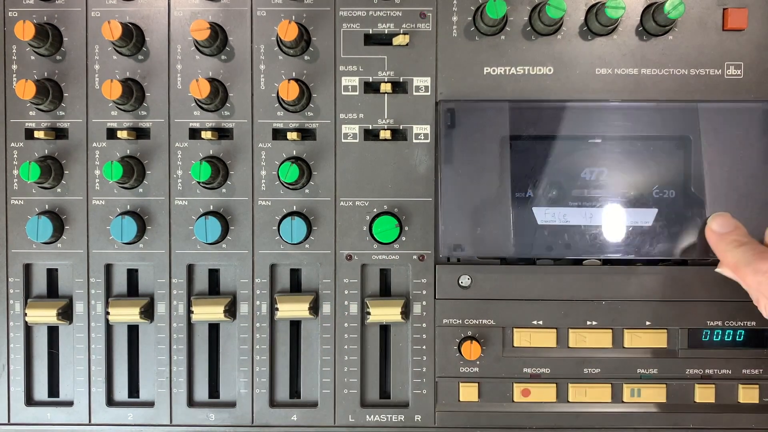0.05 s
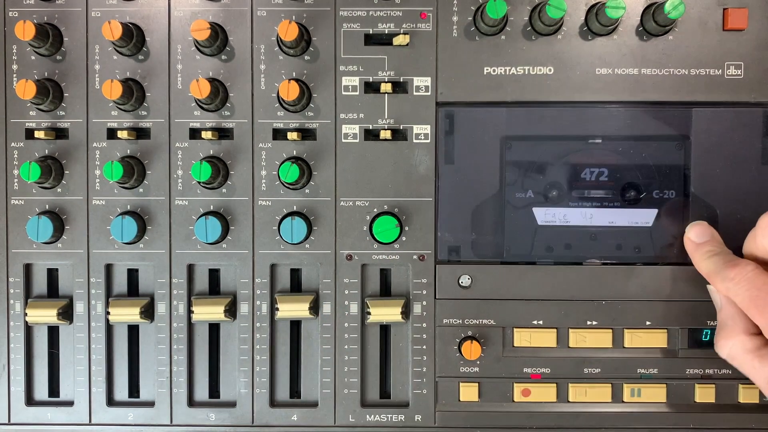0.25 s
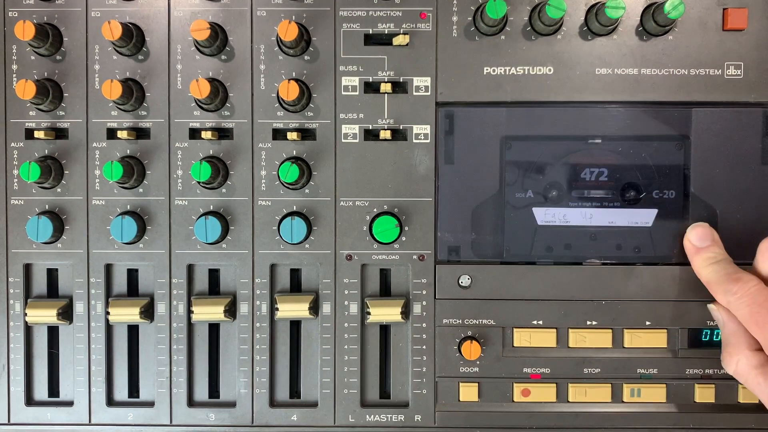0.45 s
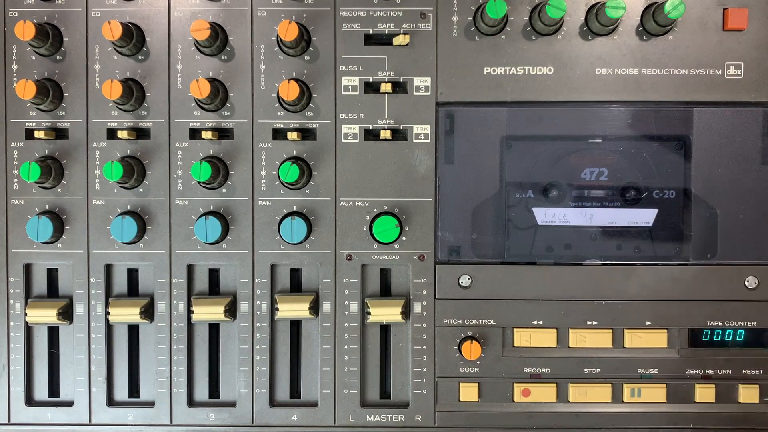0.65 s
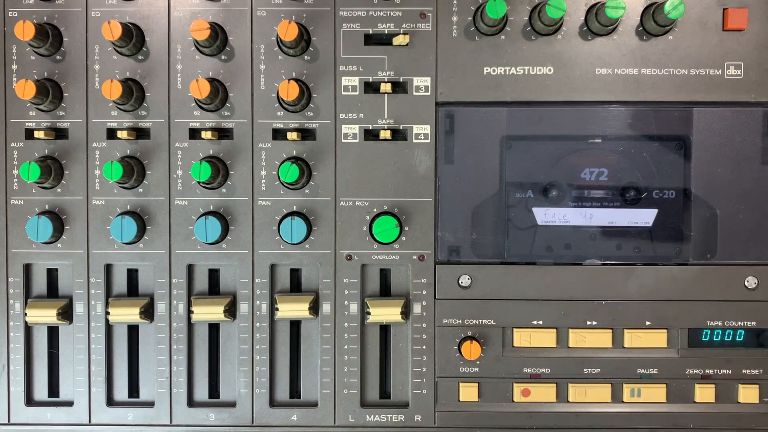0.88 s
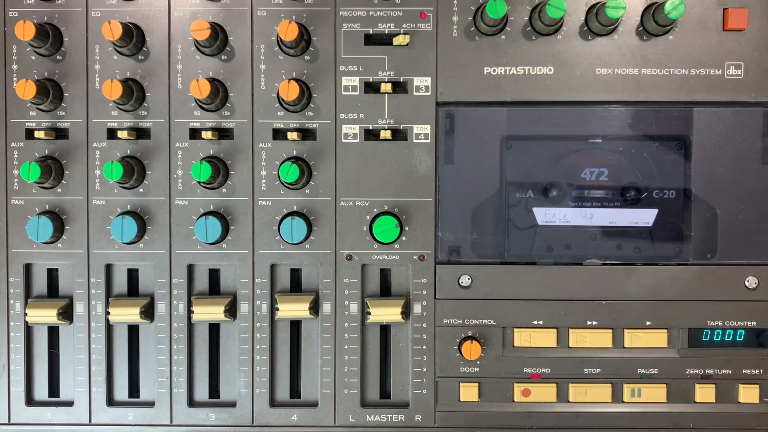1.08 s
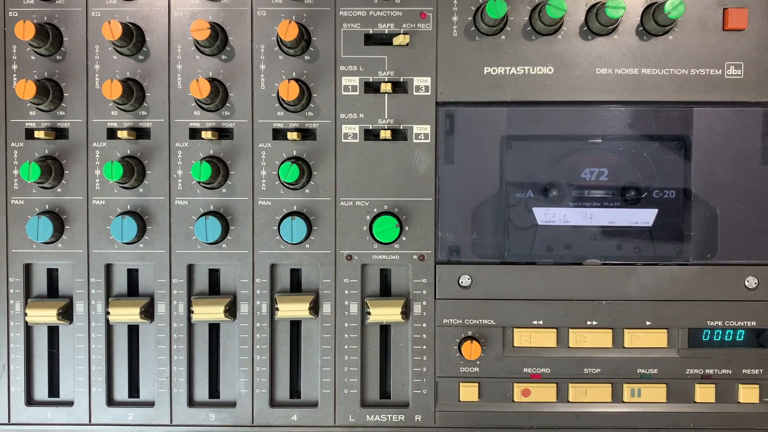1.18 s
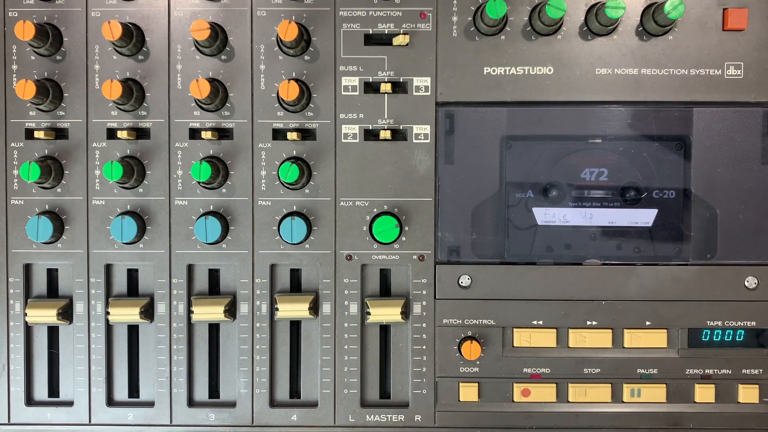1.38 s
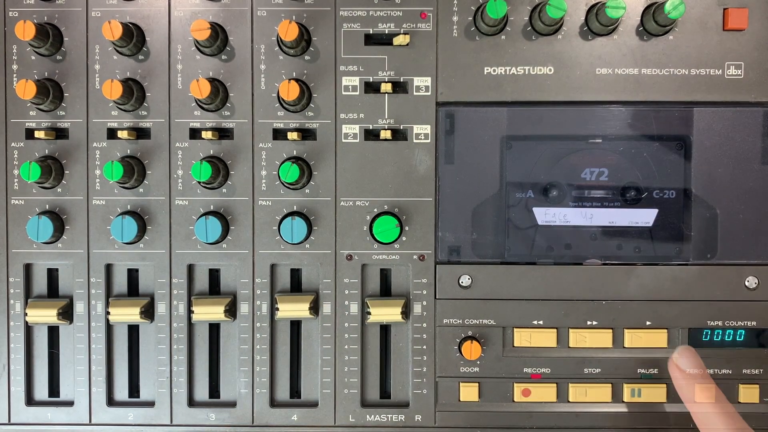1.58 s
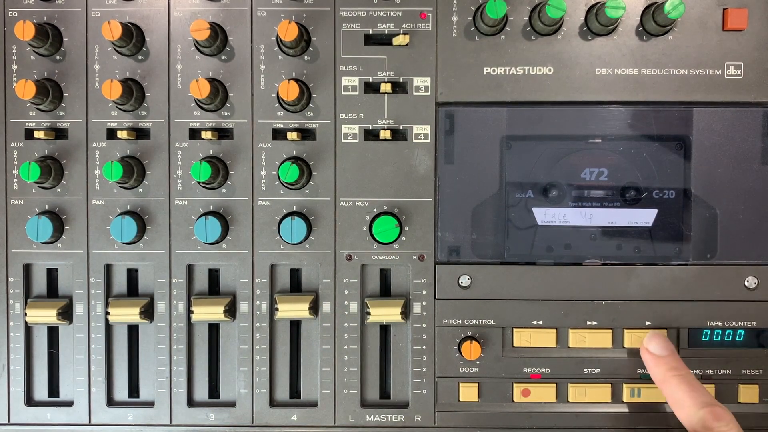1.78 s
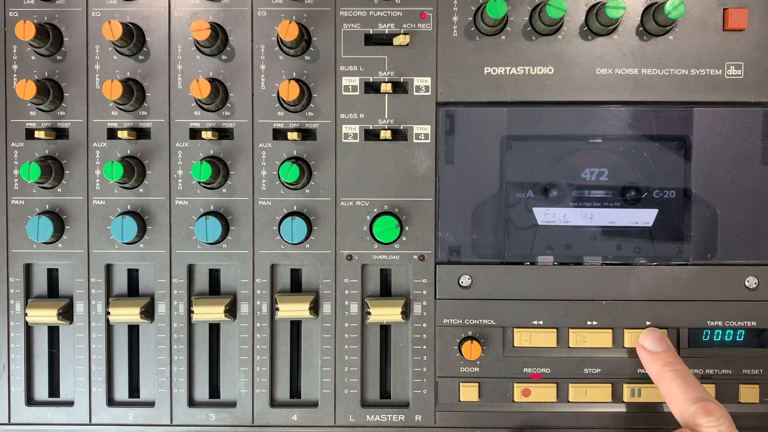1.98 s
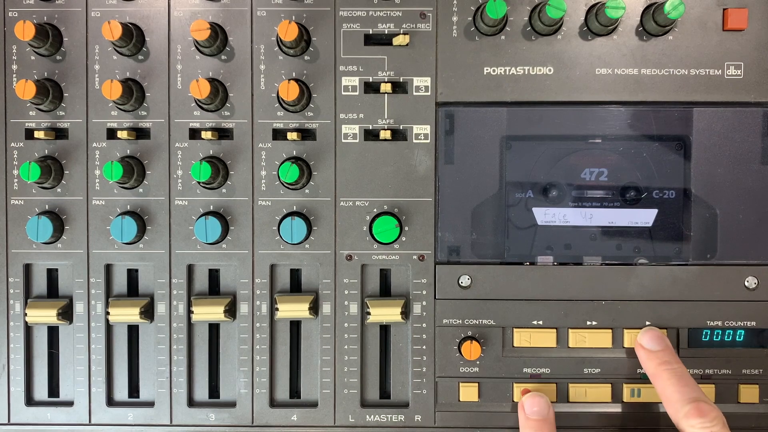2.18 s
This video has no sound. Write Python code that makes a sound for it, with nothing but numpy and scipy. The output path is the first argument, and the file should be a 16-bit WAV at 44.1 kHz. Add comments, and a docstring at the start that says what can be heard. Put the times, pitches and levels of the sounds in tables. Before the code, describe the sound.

A cassette recorder lid closes: a finger faintly rubs plastic from 0.07 seconds, a tick at 0.19, then a very loud, bright snap at 0.22 with a low desk thump. Softer latch clicks come at 0.58 and 0.62. Quiet room air and low hum remain until a key clunks sharply at 1.91, with smaller clicks to 2.24 over faint mechanism hiss and clatter. Small room, close phone microphone.

```python
"""Quiet air, faint narrow bands and a low hum lie under everything, in a small room heard by a phone close above.
A finger rubs the plastic lid of a desk cassette recorder (shaped noise) and pushes it shut: a tick, a loud snap,
then the latch clicks twice as the finger lets go. Each blow is a noise crack plus a push that rings tuned modes.
The snap comes with the desk ringing in low sines. Later a key is pressed and the mechanism clunks in with more
blows, then runs with a noise hiss and a clatter of random ticks through its own modes."""
import sys
import numpy as np
from scipy import signal
from scipy.fft import rfft, irfft
from scipy.io import wavfile
from scipy.ndimage import uniform_filter1d

SR = 44100
rng = np.random.default_rng(int(sys.argv[2]) if len(sys.argv) > 2 else 0)


def persist_wave(psi):
    """Save psi, clipped to +-1, as 16-bit WAV."""
    counts = np.round(np.clip(psi, -1, 1) * 32767).astype(np.int16)
    wavfile.write(sys.argv[1], SR, np.atleast_2d(counts).T)


N = 99225  # length in samples, 2.25 s

# quiet air, relative spectrum: pitch_hz, density_db (per Hz)
AIR_SPECTRUM = [(20, -23), (40, -8.5), (70, 4.5), (120, -12), (180, -25.5), (460, -31.5), (1000, -36.5),
                (2000, -39), (4000, -43), (9000, -43), (11000, -44.5), (16000, -59.5)]
# faint narrow bands in the air: pitch_hz, level_db (before the air's sag), loudest_s, fall_db_per_s away from it
FAINT_BANDS = [(231, -86, 0.77, 3), (444, -96, .6, 1.5), (2045, -87.5, 1.1, 9), (3860, -92.5, 1.4, 19.5),
               (890, -98, 1.6, 14.5)]
AIR_DB, AIR_SAG_DB_PER_S, AIR_LEVEL_AT_S = -67, -6, 1.77  # the sag passes 0 dB at the last of these
BAND_WAVER_PER_S = 25

# low hum: time_s, level_db, pitch_hz
HUM_CURVE = [(0.0, -58, 90.4), (0.14, -55.5, 91.87), (0.27, -49.5, 89.36), (0.62, -56, 89.5),
             (1.03, -61.5, 90.17), (1.22, -63.5, 90.44), (1.4, -67, 90.27), (1.92, -57.5, 90.8),
             (2.25, -57, 92.4)]
# ringing of the desk: time_s, level_db, pitch_hz
DESK_CURVE = [(0.2, -23, 56.4), (0.23, -23.5, 64.3), (0.26, -27, 60.6), (0.32, -48, 57.8),
              (0.36, -40.5, 60.5), (0.41, -53, 61.3), (0.49, -53.5, 57), (0.53, -50, 63.5),
              (0.64, -42, 64.72), (0.74, -54.5, 64), (0.8, -70, 66.4), (0.84, -56, 64.2),
              (0.92, -60.5, 65.7), (0.98, -49, 63.45), (1.05, -57.5, 62.3), (1.14, -45.5, 61.1),
              (1.23, -46.5, 62.02), (1.4, -56, 61.8), (1.62, -62.5, 60.45), (1.78, -79, 60.47),
              (2.11, -57.5, 61.6), (2.25, -67, 66)]
# low thuds through the desk: start_s, pitch_hz, level_db (before swell and decay), rise_s, t60_s
DESK_THUDS = [(0.22, 32.3, -44, 0.0038, 0.16), (0.219, 93, -42, 0.026, 0.083),
              (0.242, 115, -20, 0.005, 0.11), (0.587, 95.6, -35, 0.0069, 0.35),
              (0.64, 117, -16.5, 0.084, 0.18), (0.601, 45, -33.5, 0.044, 0.39),
              (2.076, 103.9, -46, 0.015, 0.13)]

# decay time of the room: pitch_hz, t60_s
ROOM_DECAY = [(100, 0.31), (500, 0.36), (2000, 0.3), (6000, 0.25), (14000, 0.12)]
ROOM_DB, ROOM_RISE_S, ROOM_ALIKE = -7, 0.0013, 0.26
LINGER_DB, LINGER_T60_S, LINGER_HZ = -32.5, 2.2, 296  # quiet, slow low end of the tail
BODY_IN_ROOM_DB = -3

# hiss of the running mechanism, relative spectrum: pitch_hz, density_db (per Hz)
HISS_SPECTRUM = [(100, -8), (200, 0.5), (560, 4.5), (1100, -19.5), (1700, -6.5), (3000, -14.5), (5000, -16),
                 (7000, -10.5), (11000, -12), (14500, -5), (16000, -19.5)]
HISS_START_S, HISS_DB, HISS_SAG_DB_PER_S, HISS_FLICKER_DB = 1.915, -53, -12, 2
CLATTER_PER_S, CLATTER_DB, CLATTER_SCATTER_DB = 450, -59, 6
CLATTER_SAG_DB_PER_S, CLATTER_TILT_DB_PER_OCTAVE = -23, 4

# finger rubbing the lid, relative spectrum: pitch_hz, density_db (per Hz)
RUB_SPECTRUM = [(150, -14.5), (350, -4), (850, -21), (1130, -15.5), (1450, -24), (2080, -20.5),
                (4500, -27.5), (6000, -22), (8000, -24), (11000, -36.5), (16000, -40)]
RUB_START_S, RUB_SWELL_S, RUB_END_S, RUB_DB = .07, 0.09, 0.29, -50

# blows of key and mechanism: start_s, crack_level_db (before halving and shape), body_level_db (drive into
# the modes), crack_colour_hz, rise_ms, fall_ms, body_tilt_db_per_octave
KEY_BLOWS = [(1.829, -60, -63, 600, 6, 13.8, -5.5), (1.888, -52.5, -68, 2500, 21, 44, 0),
             (1.9125, -26, -49.5, 3490, 0.7, 1.95, 16), (1.9155, -22.5, -54, 2980, 0.87, 5.7, 11),
             (1.942, -38, -59.5, 1920, 4.6, 6.5, 13), (1.967, -36.5, -55, 8000, 2.1, 5, -4),
             (1.988, -36.5, -40, 1798, 4.6, 7.8, -0.8), (2.015, -45, -62, 800, 1.4, 4, -6.5),
             (2.034, -57.5, -51.5, 1197, 7, 5.6, -5.5), (2.066, -69, -45.5, 1620, 15, 8.5, 1.2),
             (2.093, -41, -64, 606, 2.1, 3.8, -9), (2.226, -44, -63, 2080, 7.7, 7.7, 12),
             (2.236, -37, -55, 1850, 1.5, 6.6, 6)]
# modes of the mechanism: pitch_hz, level_db (before tilt and scatter), t60_s
KEY_MODES = [(153, -12, 0.0663), (262, -26.5, 0.052), (338.7, -12.5, 0.275), (473.6, -4.5, 0.0992),
             (553, -12.5, 0.173), (680, -1, 0.047), (944, -5, 0.029), (1230, -2.5, 0.031),
             (1603, -5, 0.046), (1787, -5.5, 0.063), (2047, -11.5, 0.049), (2286, -16, 0.105),
             (3403, -18, 0.016), (4420, -17, 0.018)]
# blows on the lid: start_s, crack_level_db (before halving and shape), body_level_db (drive into the modes),
# crack_colour_hz, rise_ms, fall_ms, body_tilt_db_per_octave
LID_BLOWS = [(0.1866, -22.5, -33, 6940, 0.39, 12.4, 1.4), (0.2172, -6.5, -20, 2315, 1.8, 7.2, 0.5),
             (0.2226, 0.5, -26.5, 8130, 2.2, 5.1, 1.4), (0.2262, -6.5, -17, 7500, 0.6, 4.5, -0.6),
             (0.2305, -22.5, -27.5, 2910, 1.1, 13, -0.1), (0.2385, -30.5, -31.5, 8130, 2.35, 4.9, -0.5),
             (0.2605, -21.5, -34.5, 2960, 1.9, 1.8, -3), (0.279, -20.5, -38.5, 1930, 1.5, 3, -2),
             (0.5495, -56, -52.5, 6170, 2.3, 45, -1.5), (0.5826, -19.5, -53, 7330, 0.17, 3.9, -12),
             (0.583, -21.5, -33, 1700, 0.71, 9.2, -0.5), (0.604, -29, -39, 1300, 2.76, 8, 2),
             (0.6225, -20, -33, 7190, 0.33, 3.17, 1.2), (0.6255, -22, -40, 1570, 0.95, 4.6, -4.2),
             (0.645, -32, -42.5, 1500, 2.5, 7.1, -1.5), (0.652, -28, -54, 7000, 0.7, 2.2, -3.2),
             (0.655, -36, -44.5, 2018, 1.9, 2.8, -5), (0.806, -64, -80, 6010, 2.1, 4.46, 2),
             (0.984, -51.5, -71, 3540, 6.9, 12.95, 7.5)]
# modes of lid and case: pitch_hz, level_db (before tilt and scatter), t60_s
LID_MODES = [(191.3, -11, 0.2), (261.5, -8, 0.12), (325.2, 1, 0.091), (405, -0.5, 0.061), (468, -8, 0.081),
             (579, -8.5, 0.036), (655, -8, 0.064), (741.5, -8, 0.065), (965, -11, 0.035),
             (1090, -14, 0.034), (1300, -15, .04), (1600, -9, 0.04), (1712.6, -34.5, 0.7),
             (1861, -7, 0.032), (2155, -10, 0.045), (2380, -17.5, .04), (2700, -17, .03),
             (3250, -19.5, .04)]

CRACK_WIDTH_OCTAVES, CRACK_TOP_HZ = 0.79, 12800
CRACK_BROAD_DB, BROAD_REACH = -20, 7  # the broad part rolls off this many times above the crack's colour
PUSH_MS, GRIT_HZ, GRIT_DB = 0.3, 483, 7.5
MODE_SCATTER_DB, MODE_SCATTER_SHARE = 1.5, 0.011  # every blow finds the modes a little different

# level of the left port: pitch_hz, level_db
LEFT_LEVEL = [(0, -1.3), (2500, -2.5), (4000, -.2), (16000, 0)]
# phase of the left port against the right: pitch_hz, lead_half_cycles (negative trails)
LEFT_LEAD = [(0, 0), (500, -.1), (2700, .42), (5300, 1), (8400, 2), (12500, 3), (16500, 4)]
ALIKE_BELOW_HZ, ALIKE_ABOVE_HZ = 84, 6500  # noises become the same in both ports beyond these
TOP_HZ = 16300


def amp(db):
    """Turn decibels into a gain."""
    return 10 ** (np.asarray(db) / 20)


def unit(x):
    """Scale to an rms of 1."""
    return x / np.sqrt(np.mean(x ** 2))


def decay(t, t60):
    """Exponential decay that falls 60 dB in t60 seconds."""
    return np.exp(-np.log(1000) * t / t60)


def shaped(x, gain):
    """Filter by a gain that is a function of frequency."""
    n = x.shape[-1]
    hz = np.arange(n // 2 + 1) * SR / n + 1  # the extra 1 Hz keeps logarithms finite
    return irfft(rfft(x) * gain(hz), n)


def pair(size, alike):
    """Two noises, the same in the bass and high treble, partly alike between."""
    a, b = rng.standard_normal((2, size))

    def separate(f):
        bass_cut = f ** 2 / (f ** 2 + ALIKE_BELOW_HZ ** 2)
        treble_cut = 1 / (1 + (f / ALIKE_ABOVE_HZ) ** 10)
        return np.sqrt(1 - min(alike, 1) ** 2) * bass_cut * treble_cut

    common = shaped(a, lambda f: np.sqrt(1 - separate(f) ** 2))
    return np.array([a, common + shaped(b, separate)])


def noise(spectrum, alike):
    """Two-channel noise of a given spectrum; rms 1."""
    hz, db = np.array(spectrum).T
    return unit(shaped(pair(N, alike), lambda f: amp(np.interp(np.log(f), np.log(hz), db))))


def walk(rate):
    """Smoothed random steps, rate per second, spread near 1."""
    k = int(SR / rate)
    steps = np.repeat(rng.standard_normal(N // k + 1), k)
    return 1.4 * uniform_filter1d(uniform_filter1d(steps, k), k)[:N]


def tone(curve, t):
    """A low sine on a level and pitch curve, silent before its first point."""
    s, db, hz = np.array(curve).T
    level = np.sqrt(2) * amp(np.interp(t, s, db, left=-120))
    phase = 2 * np.pi * np.cumsum(np.interp(t, s, hz)) / SR
    return level * np.sin(phase)


def faint_bands(t):
    """Narrow bands of noise, each wavering and loudest at its own moment."""
    bands = 0
    for hz, db, loudest, fall in FAINT_BANDS:
        level = amp(db - fall * np.abs(t - loudest) + 3.0 * walk(BAND_WAVER_PER_S))
        band = shaped(rng.standard_normal(N), lambda f: 1 / (1 + ((f - hz) / (0.034 * hz)) ** 2))
        bands = bands + level * unit(band)
    return bands


def room_air(t):
    """Quiet broadband air noise with the faint bands, steadily getting quieter."""
    bands = faint_bands(t)
    air = noise(AIR_SPECTRUM, 0.1) * amp(AIR_DB + 0.69 * walk(24))
    return (air + bands) * amp(AIR_SAG_DB_PER_S * (t - AIR_LEVEL_AT_S))


def hum(t):
    """A low sine near 90 Hz that drifts in level and pitch."""
    return tone(HUM_CURVE, t)


def thuds(t):
    """Low sine rings that swell and die away through the desk."""
    out = 0
    for s, hz, db, rise, t60 in DESK_THUDS:
        age = np.maximum(t - s, 0)
        out = out + amp(db) * np.sin(2 * np.pi * hz * age) * (1 - np.exp(-age / rise)) * decay(age, t60)
    return out


def desk(t):
    """The ringing desk: one drifting low sine, faded in over 80 ms, plus the thuds."""
    fade_in = np.clip((t - DESK_CURVE[0][0]) / 0.08, 0, 1)
    return tone(DESK_CURVE, t) * fade_in + thuds(t)


def room(x):
    """Reverb from a decaying noise tail, band by band, partly alike in both ports."""
    t, tail = np.arange(SR) / SR, 0
    hz, t60 = np.array(ROOM_DECAY).T
    for centre in 2 ** np.arange(7, 14.1, 1):  # octave bands from 128 Hz
        band = shaped(pair(len(t), ROOM_ALIKE),
                      lambda f: np.cos(np.pi / 2 * np.clip(np.log2(f / centre), -1, 1)))
        tail = tail + band * decay(t, np.interp(np.log(centre), np.log(hz), t60))
    low = shaped(pair(len(t), ROOM_ALIKE), lambda f: np.exp(-np.log2(f / LINGER_HZ) ** 2))
    tail = tail + amp(LINGER_DB) * low * decay(t, LINGER_T60_S)  # the lows linger
    tail = tail * (1 - np.exp(-t / ROOM_RISE_S))
    tail = tail / np.sqrt(np.sum(tail ** 2) / 2)  # unit energy per port on average
    return signal.fftconvolve(x[None], tail, axes=1)[:, :N] * amp(ROOM_DB)


def ring(modes, tilt_db):
    """Decaying sines answer one tap; neighbours start in opposite directions, short modes are scattered."""
    t = np.arange(SR // 2) / SR
    hz, db, t60 = np.array(modes).T[:, :, None]
    chance = rng.standard_normal((2, len(modes), 1)) * (t60 < .3)  # long modes stay in tune
    sign = (-1.) ** np.arange(len(modes))[:, None]
    gain = sign * amp(db + tilt_db * np.log2(hz / 1000) + MODE_SCATTER_DB * chance[0])
    detuned_hz = hz * (1 + MODE_SCATTER_SHARE * chance[1])
    return np.sum(gain * np.sin(2 * np.pi * detuned_hz * t) * decay(t, t60), axis=0)


def hiss(t):
    """Mechanism hiss: noise that starts with the key, flickers and sags."""
    age = t - HISS_START_S
    steady = noise(HISS_SPECTRUM, 0.35)
    level = amp(HISS_DB + HISS_SAG_DB_PER_S * age + HISS_FLICKER_DB * walk(59.91))
    return steady * np.clip(age / 0.0118, 0, 1) * level


def clatter(t):
    """Gears and belts tick unevenly into the mechanism's modes once it runs."""
    age = t - HISS_START_S
    ticks = (rng.random(N) < CLATTER_PER_S / SR) * rng.standard_normal(N)
    ticks = ticks * amp(CLATTER_SCATTER_DB * walk(40))
    rung = unit(signal.fftconvolve(ticks, ring(KEY_MODES, CLATTER_TILT_DB_PER_OCTAVE))[:N])
    return rung * np.clip(age / 0.0094, 0, 1) * amp(CLATTER_DB + CLATTER_SAG_DB_PER_S * age)


def rub(t):
    """Skin slides on plastic: grainy noise that swells and stops short."""
    swell = np.clip((t - RUB_START_S) / RUB_SWELL_S, 0, 1) ** 1.46
    stop = np.clip((RUB_END_S - t) / 0.011, 0, 1)
    return noise(RUB_SPECTRUM, 0.43) * swell * stop * amp(RUB_DB + 2.2 * walk(120))


def crack_noise(chance, colour_hz):
    """Noise of a rough contact: a bump around its colour over a fainter broad part; rms 1."""
    def colour(f):
        bump = np.exp(-.5 * (np.log2(f / colour_hz) / CRACK_WIDTH_OCTAVES) ** 2)
        broad = amp(CRACK_BROAD_DB) * (f > 400) / (1 + (f / colour_hz / BROAD_REACH) ** 4)
        return (bump + broad) / (1 + (f / CRACK_TOP_HZ) ** 6)

    return unit(shaped(chance, colour))


def blows(table, modes):
    """Each blow is a rough contact: heard as a coloured crack, and ringing the modes as body."""
    size = 4096  # samples of contact, about 93 ms
    crack, body = np.zeros(N + SR), np.zeros(N + SR)
    ms = np.arange(size) / SR * 1000
    # a smooth push drives the low modes, grit the high ones
    push = ms * np.exp(-ms / PUSH_MS)
    push = push / np.sum(push)
    for s, crack_db, body_db, colour_hz, rise_ms, fall_ms, tilt_db in table:
        i = int(s * SR)
        chance = rng.standard_normal((2, size))
        shape = (1 - np.exp(-ms / rise_ms)) * np.exp(-ms / fall_ms)
        crack[i:i + size] += crack_noise(chance[0], colour_hz) * shape * amp(crack_db) / 2
        grit = shaped(chance[1], lambda f: f ** 2 / (f ** 2 + GRIT_HZ ** 2))
        grit = grit * shape / np.sqrt(np.sum(shape ** 2))
        drive = (grit * amp(GRIT_DB) + push) * amp(body_db)
        rung = signal.fftconvolve(drive, ring(modes, tilt_db))
        body[i:i + len(rung)] += rung
    return np.array([crack[:N], body[:N]])


def key():
    """Key press and clunk: contacts ring the modes of the mechanism."""
    return blows(KEY_BLOWS, KEY_MODES)


def lid():
    """Tick, snap and latch clicks: contacts ring the modes of lid and case."""
    return blows(LID_BLOWS, LID_MODES)


def two_ports(both):
    """The left port is a little quieter below the treble, trails slightly in the bass, leads above about 1 kHz."""
    def left(f):
        half_cycles = np.interp(f, *np.array(LEFT_LEAD).T)
        return np.exp(1j * np.pi * half_cycles) * amp(np.interp(f, *np.array(LEFT_LEVEL).T))

    return np.array([shaped(both[0], left), both[1]])


def scene():
    """Mix lid, key, mechanism and background; blows and clatter also feed the room."""
    t = np.arange(N) / SR
    crack, body = lid() + key()
    body = body + clatter(t)
    reverb = room(crack + amp(BODY_IN_ROOM_DB) * body)
    handling = crack + body + reverb + rub(t) + hiss(t)
    background = room_air(t) + desk(t) + hum(t)
    return two_ports(handling + background)


def record(dry):
    """The phone rounds the loudest peaks and cuts the top."""
    top_cut = signal.ellip(10, .2, 80, TOP_HZ, fs=SR, output="sos")
    return signal.sosfilt(top_cut, np.tanh(dry))


dry = scene()
out = record(dry)
persist_wave(out)
```